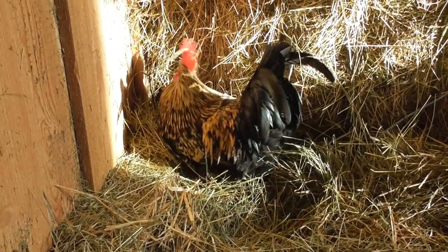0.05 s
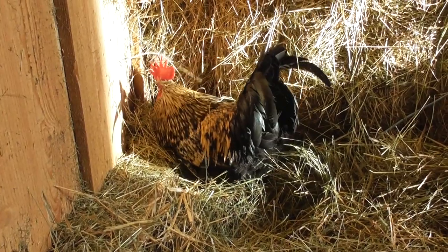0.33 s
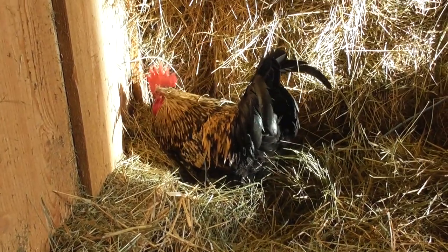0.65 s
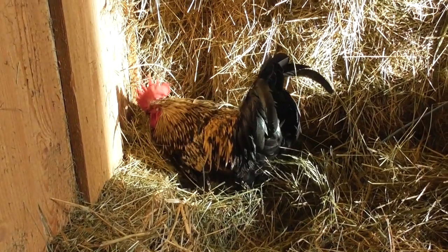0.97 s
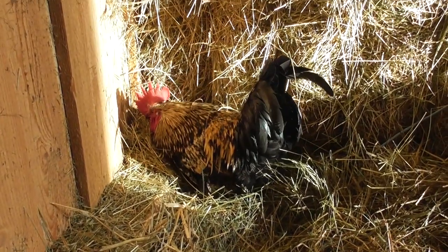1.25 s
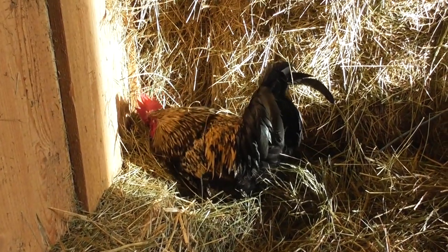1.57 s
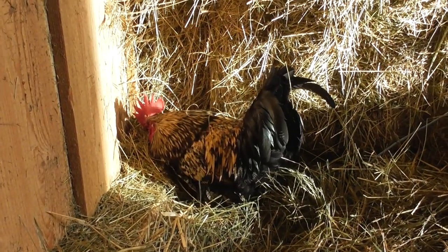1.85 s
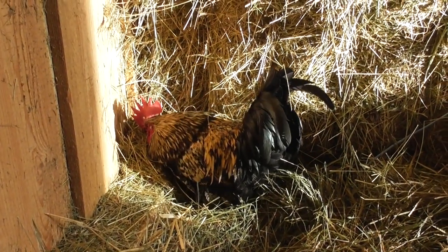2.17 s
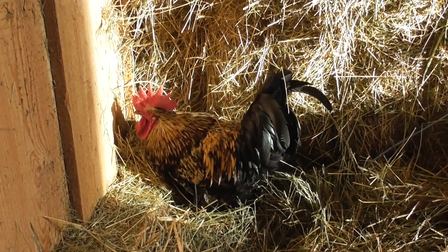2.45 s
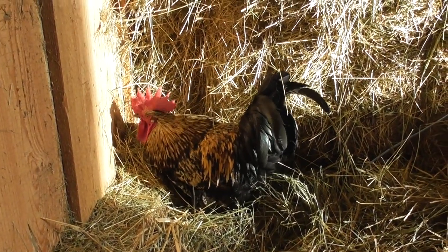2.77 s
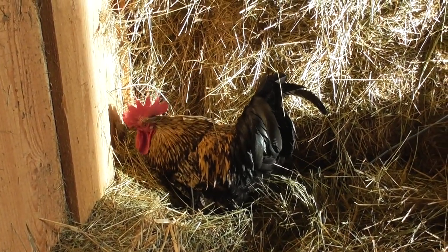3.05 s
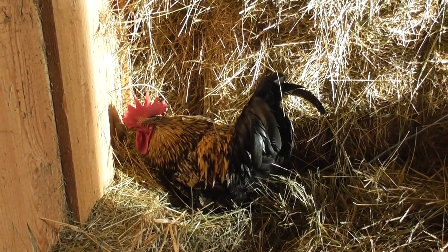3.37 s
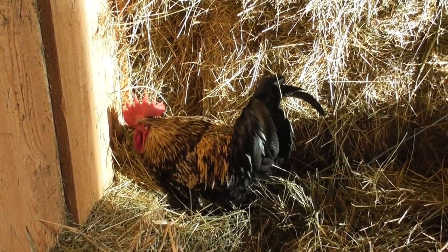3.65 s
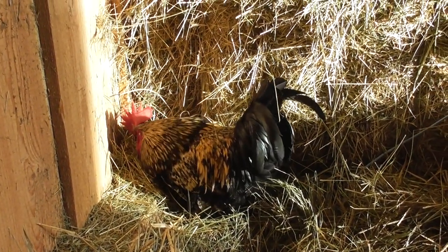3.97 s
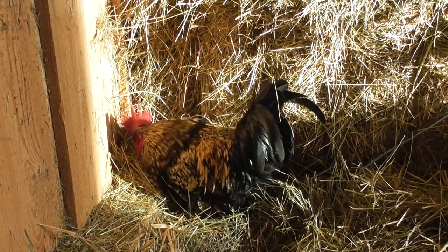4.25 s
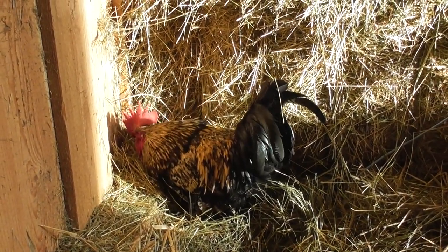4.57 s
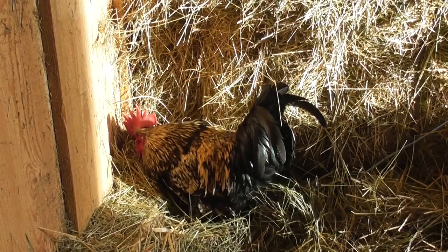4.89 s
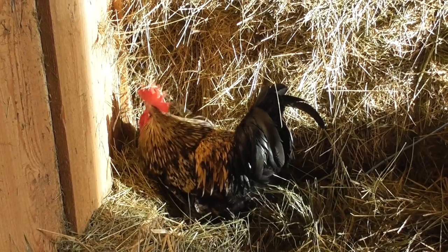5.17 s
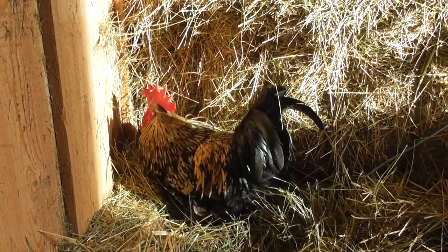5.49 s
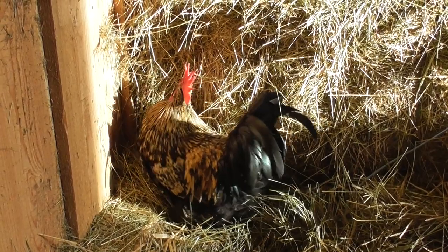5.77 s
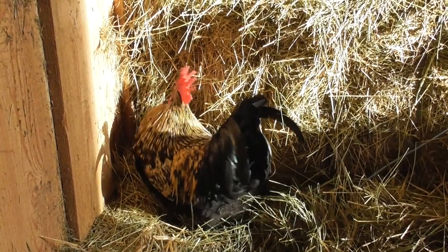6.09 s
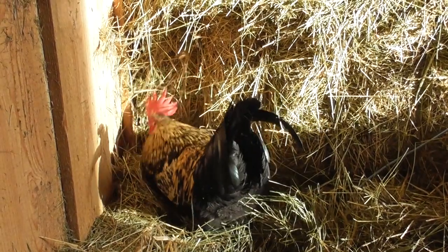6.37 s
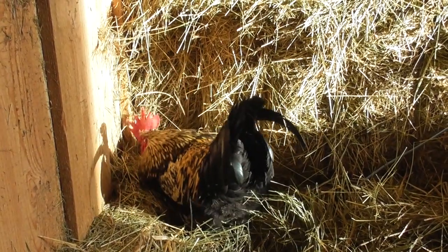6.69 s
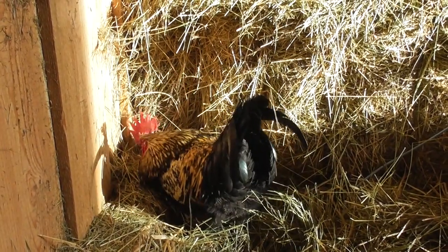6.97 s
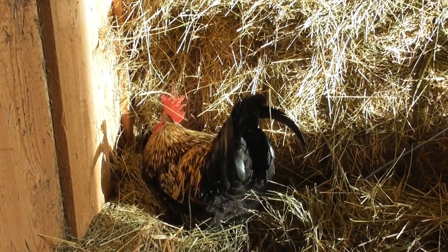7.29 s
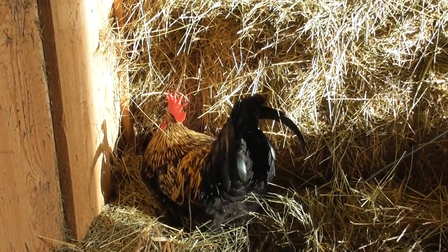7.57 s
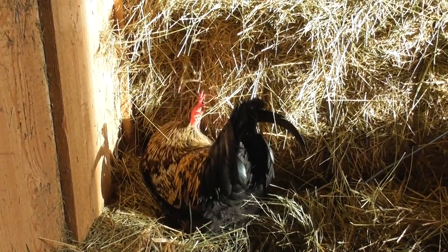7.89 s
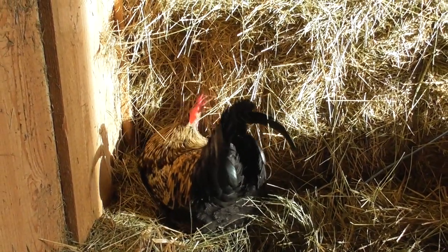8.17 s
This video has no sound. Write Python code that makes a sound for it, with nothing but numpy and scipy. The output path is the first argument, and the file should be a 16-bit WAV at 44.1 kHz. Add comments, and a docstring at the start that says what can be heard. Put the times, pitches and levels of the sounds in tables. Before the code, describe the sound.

A rooster clucks and coos softly up close while dry hay rustles and snaps under him in a quiet barn.

```python
"""A rooster clucks with his beak nearly shut as he settles into a nest of hay in a barn.
His syrinx is the source and his throat the filter: short pulse trains make runs of low knocks,
and sustained oscillation draws them out into cooing, rasping notes. Further off are short, low hen
notes and the faint, thin crows of a distant rooster. Hay rustles by friction and snaps by fracture
as he shuffles. The planks reflect the calls, over a low murmur of air and a faint hiss."""
import sys
import numpy as np
from scipy import signal
from scipy.fft import rfft, irfft
from scipy.io import wavfile

SR = 44100
rng = np.random.default_rng(int(sys.argv[2]) if len(sys.argv) > 2 else 0)


def int16_out(signal):
    """Quantize to a 16-bit WAV file."""
    q = np.round(np.clip(np.atleast_2d(signal).T, -1, 1) * 32767)
    wavfile.write(sys.argv[1], SR, q.astype(np.int16))


N = 367794

# spectrum of dry hay: f/Hz, relative spectral level/dB
HAY_SPECTRUM = [(500, -19.5), (1500, -10), (2400, -17), (2900, -15.5), (3900, -12.5), (5100, -22),
                (6100, -10.5), (7600, -3.5), (12000, -9.5), (16000, -17)]


def slapping(start, length, db, first_hz, last_hz, throat_hz, swell_db, limp=0, size=4096):
    """Source and filter: a gliding train of uneven slaps of the syrinx rings the throat."""
    t = np.arange(0, length, 1 / SR)
    uneven = 1 + .09 * wander(size, 400)[:len(t)]
    cycle = np.floor(np.cumsum(uneven * (first_hz + (last_hz - first_hz) * t / length)) / SR)
    slaps = np.diff(cycle, prepend=-1) * (1 - limp * (cycle % 2))
    pressure = gain_of(swell_db * t / length) * np.minimum((1 - t / length) / 0.21, 1)
    f = np.fft.rfftfreq(size, 1 / SR)
    voice = irfft(rfft(slaps * pressure, size) * throat(f, start, throat_hz))
    voice *= np.sqrt(len(t) / np.sum(voice ** 2))
    return gain_of(db) * buzzing(voice)


def clucks(climb_per_s=5):
    """Period doubling: as pressure builds, a slack syrinx weakens alternate slaps, an octave down."""
    # t/s, duration/s, relative level/dB, starting f/Hz, weakening of alternate slaps (0-1)
    calls = [(0.0045, 0.035, -24, 306.4, 0.21), (0.14, 0.028, -25, 299, 0.13),
             (1.517, 0.015, -28, 395.7, 0.9), (3.502, 0.019, -29, 331, 0.85),
             (3.629, 0.022, -27, 304.4, 0.6), (3.78, 0.02, -25.5, 295, 0.85),
             (3.944, 0.022, -26.5, 294, 0.8), (4.137, 0.02, -25, 307.5, 0.52),
             (4.3145, 0.011, -26.5, 413, 1), (5.308, 0.026, -21.5, 403.6, 0.46),
             (5.401, 0.0267, -22.5, 324.6, 0.0), (5.539, 0.026, -24, 322.7, 0.55),
             (5.663, 0.028, -23.5, 311, 0.21), (5.783, 0.026, -25, 305.6, 0.13),
             (5.901, 0.032, -28, 298.3, 0.5), (6.005, 0.036, -28.5, 294.2, 0.58),
             (6.128, 0.031, -29, 293.2, 0.4), (6.266, 0.041, -23.5, 330, 0.19)]
    out = np.zeros(N)
    for start, length, db, hz, limp in calls:
        last_hz = hz * (1 + climb_per_s * length)
        add(out, start, slapping(start, length, db, hz, last_hz, 430.2, swell_db=8.5, limp=limp))
    return out


def knocks():
    """Impulse response: one slap rings the throat as the syrinx opens ahead of a call."""
    # lone slaps: t/s, relative level/dB
    slaps = [(0.6331, -34.5), (1.684, -45), (5.2976, -25.5), (7.2033, -31.5), (7.7227, -36.5),
             (8.2571, -40.5)]
    out = np.zeros(N)
    for start, db in slaps:
        add(out, start, slapping(start, .0045, db, 200, 200, throat_hz=426, swell_db=0))
    return out


def puks(length_s=0.011, pitch_ratio=0.607):
    """Tension sets pitch: a tight syrinx lets go, and the pitch drops as the level leaps."""
    # sharp "puk" calls: t/s, relative level/dB, starting f/Hz
    calls = [(0.6651, -29, 557), (1.714, -23, 512), (6.5346, -25.5, 530), (6.7154, -29, 635),
             (7.2296, -24.1, 702), (7.7462, -23.5, 877), (8.2868, -27, 850)]
    out = np.zeros(N)
    for start, db, hz in calls:
        throat_hz = 421 * (hz / 553) ** 0.37  # a higher puk comes from a tighter throat
        add(out, start, slapping(start, length_s, db, hz, hz * pitch_ratio, throat_hz, swell_db=7))
    return out


def held_note(start, hz, rough, octave_db, nasal_db, throat_hz=450, jitter=0.08, undertone_db=-8):
    """Nonlinear oscillation: with roughness, alternating cycles give subharmonics, then chaos."""
    turns = np.cumsum(hz * (1 + jitter * rough * wander(len(hz), 160))) / SR
    order = np.arange(1, 17)[:, None] / 2  # harmonics and the half orders between them
    lines = throat(order * hz, start, throat_hz, width_hz=190, leak_db=-44.5)
    lines *= np.where(order % 1, 0.83 * rough, 1)
    lines *= gain_of(octave_db * np.log2(np.clip(order, 1, 2)) + undertone_db * (order < 1))
    voice = (lines * np.exp(2j * np.pi * order * turns)).real.sum(0)
    voice /= np.sqrt(np.sum(abs(lines) ** 2, 0) / 2)
    nasal = sum(gain_of(nasal_db - 3 * np.log2(k / np.pi)) * np.cos(2 * np.pi * k * turns)
                for k in range(3, 9))
    chaos = 1.88 * rough ** 2  # takes over only in the roughest stretches
    voice = (voice + chaos * rasp(len(hz), start, throat_hz)) / np.sqrt(1 + chaos ** 2)
    return buzzing(voice, buzz_db=-57, buzz_hz=3300, width_hz=1200) + nasal


def coos(clear=0.066, flutter_db=1.5, flutter_hz=70):
    """Onset of instability: a drawn-out note starts clear, roughens midway and clears again."""
    # one contour a note: t/s, relative level/dB, f/Hz
    contours = [
        [(0.223, -15, 422), (0.231, -17, 448.5), (0.303, -20, 447), (0.327, -24, 452), (0.353, -26.5, 379.4),
         (0.372, -23.5, 385)],
        [(6.29, -19, 380), (6.298, -29, 378), (6.314, -32, 474), (6.338, -23, 467), (6.368, -24.5, 445),
         (6.41, -19, 448), (6.496, -29, 451.5), (6.522, -29.5, 446)],
        [(7.858, -15, 510), (7.87, -30.5, 516.4), (7.944, -26, 498.7), (7.994, -29, 510.7), (8.022, -22, 488),
         (8.042, -27, 482)],
    ]
    # one timbre a note: midway roughness (0-1), gain from the octave up/dB, nasal overtone level/dB
    timbres = [(.3, -13.5, -57), (.52, -12.5, -49), (.88, -2, -55.5)]
    out = np.zeros(N)
    for contour, (roughness, octave_db, nasal_db) in zip(contours, timbres):
        start, db, hz = curves(contour)
        middle = abs(np.sin(np.linspace(0, np.pi, len(hz)))) ** 1.3
        rough = clear + (roughness - clear) * middle
        db = db + flutter_db * middle * wander(len(hz), flutter_hz)  # unsteady pressure
        note = held_note(start, hz, rough, octave_db, nasal_db)
        add(out, start, gain_of(db) * note * signal.windows.tukey(len(hz), .08))
    return out


def whines():
    """Sustained oscillation: short, high notes swell and fade, each about one pitch."""
    # t/s, duration/s, relative level/dB, f/Hz
    calls = [(0.64, 0.02, -42, 607), (1.69, 0.03, -38.5, 631.5), (6.567, 0.052, -34, 454.5),
             (6.641, 0.065, -39, 641.6), (6.728, 0.029, -39.5, 663), (7.795, 0.049, -41.5, 557),
             (7.832, 0.031, -28.5, 689), (8.037, 0.03, -33, 684)]
    out = np.zeros(N)
    for start, length, db, hz in calls:
        envelope = signal.windows.tukey(round(length * SR), 0.55)
        pitch = np.full(len(envelope), float(hz))
        note = held_note(start, pitch, rough=0.4, octave_db=-7.5, nasal_db=-49)
        add(out, start, gain_of(db) * envelope * note)
    return out


def rasp(size, start, throat_hz, lowest_hz=260):
    """Chaotic flapping of the syrinx has a continuous spectrum, which the throat filters."""
    f = np.fft.rfftfreq(size, 1 / SR)
    flaps = np.exp(2j * np.pi * rng.random(len(f))) * f ** 4 / (f ** 4 + lowest_hz ** 4)
    return unit_rms(irfft(flaps * throat(f, start, throat_hz, width_hz=160), size))


def throat(f, start, main_hz, width_hz=85, leak_db=-52):
    """Formants in cascade: the shut beak passes little above 1.1 kHz but a nasal ring and some buzz."""
    # the neck stretches as the clucking grows keener:
    # t/s, upper formant f/Hz, nasal ring f/Hz, nasal ring level/dB
    neck = [(.2, 940, 2396, -40), (4.3, 902, 2218, -48), (5.35, 1055, 2090, -43), (5.7, 1040, 2100, -29),
            (5.91, 980, 2410, -27.5), (6.5, 1135, 2670, -43)]
    times, *columns = np.transpose(neck)
    upper_hz, nasal_hz, nasal_db = [np.interp(start, times, column) for column in columns]
    body = formant(f, main_hz, width_hz) * formant(f, 709, 410) * formant(f, upper_hz, 300)
    body /= 1 + 1j * f / 300
    leak = gain_of(nasal_db) * ring(f, nasal_hz, 90) + gain_of(leak_db) * ring(f, 3550, 400)
    chest_hz = 157 * (main_hz / 410) ** 3.9  # a tighter throat also thins the bass
    high_pass = formant(f, chest_hz, 160) * (f / chest_hz) ** 2
    return (body + leak) * high_pass ** 2


def buzzing(voice, buzz_db=-48, buzz_hz=2300, width_hz=1500):
    """Modulated turbulence: air squeezed through the nostrils adds a faint fizz to each cycle."""
    f = np.fft.rfftfreq(len(voice), 1 / SR)
    spectrum = rfft(rng.standard_normal(len(voice))) * ring(f, buzz_hz, width_hz) ** 2
    fizz = unit_rms(irfft(spectrum, len(voice)))
    return voice + gain_of(buzz_db) * fizz * np.maximum(voice, 0)


def other_birds(jitter=0.044, arch=0.017, fade_db=-5):
    """Harmonic series: open-beaked notes, shaped by the throat, arch slightly in pitch."""
    # short, low hen notes and faint, thin crows of a distant rooster:
    # t/s, duration/s, relative level/dB, f/Hz
    calls = [(1.843, 0.38, -71, 1105), (2.27, 0.05, -53.5, 249), (2.315, 0.045, -46, 263.2),
             (2.416, 0.031, -46.5, 287), (2.574, 0.043, -36.5, 345.2), (4.3, 0.49, -70, 1064),
             (6.057, .05, -42.5, 287.8), (6.174, 0.035, -43, 282.5), (6.898, 0.26, -70, 1080)]
    # throat response: f/Hz, relative level/dB
    response = [(250, 7.5), (350, -3), (700, 2), (1050, -2.5), (1400, -12.5), (1750, -28.5), (2100, -29.5),
                (3000, -42)]
    out = np.zeros(N)
    for start, length, db, hz in calls:
        progress = np.linspace(0, 1, round(length * SR))
        pitch = hz * (1 - arch * (2 * progress - 1) ** 2 + jitter * wander(len(progress), 140))
        turns = np.cumsum(pitch) / SR
        voice = sum(gain_of(value_at(response, k * hz)) * np.cos(2 * np.pi * k * turns)
                    for k in range(1, 9))
        envelope = gain_of(db + fade_db * progress) * signal.windows.tukey(len(progress), .2)
        add(out, start, envelope * unit_rms(voice))
    return out


def rustle(cracks_per_s=1600, spread_db=5.0, rest_db=-79):
    """Friction: feathers rub on dry stalks in swells of soft hiss full of tiny cracks."""
    # movements in the hay: centre t/s, half duration/s, relative level/dB
    shuffles = [(0.164, 0.39, -65), (0.801, 0.24, -71.5), (1.56, 0.066, -67), (2.39, 0.096, -67.5),
                (3.952, 0.11, -67.5), (4.28, 0.079, -63.5), (5.216, .04, -65), (5.789, 0.3, -66),
                (6.268, 0.074, -51), (6.414, 0.24, -59), (6.833, 0.051, -59.5), (7.239, 0.066, -58),
                (7.354, 0.08, -62), (7.844, 0.066, -58), (8.3, 0.12, -59.5)]
    cracks = rng.standard_normal((2, N)) * (rng.random(N) < cracks_per_s / SR)
    cracks *= gain_of(spread_db * np.minimum(rng.exponential(1, N), 2 * np.e - 1))
    rubbing = rng.standard_normal((2, N))
    t = np.arange(N) / SR
    power = gain_of(rest_db) ** 2 + sum(gain_of(db) ** 2 / (1 + ((t - centre) / width) ** 2) ** 2
                                        for centre, width, db in shuffles)
    return coloured(unit_rms(cracks) + rubbing, HAY_SPECTRUM) * np.sqrt(power)


def snaps(t60=0.04, rise_s=0.0078, relative_width=0.6, size=2048):
    """Damped resonance: each breaking or pecked stalk splinters in a burst around its own pitch."""
    # stalks that snap: t/s, relative peak level/dB, f/Hz
    fractures = [(0.393, -50.5, 8000), (0.8772, -47.5, 8610), (1.884, -45, 9470), (5.3438, -39.5, 8670),
                 (5.5759, -44, 7900), (5.8856, -42, 9980), (6.0237, -44, 7420), (6.4283, -38.5, 8810),
                 (6.537, -37.5, 9910), (7.236, -39, 9030), (7.3834, -45.5, 7380), (8.2172, -35.5, 13100)]
    # duller taps of the beak: t/s, relative peak level/dB, f/Hz
    pecks = [(0.09, -54, 3180), (1.749, -56.5, 3520), (1.812, -55, 3350), (5.444, -56.5, 3600)]
    out = np.zeros((2, N))
    t, f = np.arange(size) / SR, np.fft.rfftfreq(size, 1 / SR)
    for start, db, hz in fractures + pecks:
        age = t * max(hz / 8440, 1) ** 3.7  # thinner stalks snap higher and shorter
        noise = rng.standard_normal(size) + 0.18 * rng.standard_normal((2, size))
        envelope = gain_of(-60 * age / t60) * (1 - np.exp(-age / rise_s))
        stalk = gain_of(.5 * value_at(HAY_SPECTRUM, f)) * formant(f, hz, hz * relative_width) * f
        burst = irfft(rfft(noise * envelope) * stalk)
        add(out, start, gain_of(db - 3) * burst / abs(burst).max() * (1 - t / t[-1]))
    return out


def nook(x, mode_hz=450, width_hz=9, mode_db=-13):
    """Early reflections and one standing wave that hums on in the corner by the nest."""
    # echoes off the planks: delay t/s, left level/dB, right level/dB
    planks = [(.007, -15.5, -16), (0.0198, -22, -15), (0.044, -20, -15), (0.055, -28.5, -19.5)]
    f = np.fft.rfftfreq(N + SR, 1 / SR)
    hum = irfft(rfft(x, N + SR) * ring(f, mode_hz, width_hz), N + SR)[:N]
    out = gain_of(mode_db) * np.array([hum, hum])
    for delay, left_db, right_db in planks:
        add(out, delay, gain_of([[left_db], [right_db]]) * x)
    return out


def barn(x, echoes_per_s=3000):
    """Diffuse reverberation: echoes of random sign decay exponentially, each band at its own rate."""
    # reverberation time: f/Hz, t60/s
    decay_times = [(150, 0.41), (450, 0.43), (1000, 0.47), (3000, 0.3), (10000, 0.092)]
    echoes = rng.choice([-1., 1.], (2, SR)) * (rng.random((2, SR)) < echoes_per_s / SR)
    echoes[1] = 0.56 * echoes[0] + 0.77 * echoes[1]  # left and right are partly coherent
    hz, t, bands = signal.stft(echoes, SR, nperseg=256)
    decay = gain_of(-60 * t / value_at(decay_times, hz)[:, None])
    tail = signal.istft(bands * decay, SR, nperseg=256)[1]
    tail *= np.clip(np.arange(tail.shape[1]) / SR / 0.0064 - 1, 0, 1)  # a short gap, then a fade-in
    return signal.fftconvolve(x[None], tail / np.linalg.norm(tail[0]), axes=1)[:, :N]


def still_air(murmur_db=-61.5, hiss_db=-68.5):
    """Stationary noise: a low murmur of air and a faint hiss."""
    # both spectra: f/Hz, relative spectral level/dB
    murmur_spectrum = [(15, -38.5), (25, -16), (55, -2), (87, -10), (200, -14), (311, -15.5), (439, -17.5),
                       (778, -20.5), (1040, -23), (1520, -32.5), (1950, -28.5), (2400, -37), (3120, -61.5),
                       (5280, -120)]
    hiss_spectrum = [(1500, -37), (2400, -6.5), (3000, -4.5), (3800, -1), (5100, -10.5), (6200, -5.5),
                     (7600, 0.5), (10000, 1), (16000, 3.5)]
    murmur = gain_of(murmur_db) * coloured(rng.standard_normal((2, N)), murmur_spectrum)
    hiss = gain_of(hiss_db) * coloured(rng.standard_normal((2, N)), hiss_spectrum)
    return murmur + hiss


def coloured(pair, spectrum):
    """Partial coherence: two independent noises are blended into left and right of one spectrum."""
    # f/Hz, left-right correlation (0-1)
    correlation = [(30, .75), (70, 0.19), (300, 0.25), (1000, 0.27), (2000, .9), (4000, 1), (8000, 0.98),
                   (13000, 0.23)]
    hz = np.fft.rfftfreq(N, 1 / SR)
    left, independent = rfft(pair)
    shared = np.clip(value_at(correlation, hz), -1, 1)
    right = shared * left + np.sqrt(1 - shared ** 2) * independent
    return unit_rms(irfft(np.array([left, right]) * gain_of(value_at(spectrum, hz)), N))


def formant(f, hz, width):
    """Second-order resonance: flat below its frequency, falling above it."""
    return 1 / (1 - (f / hz) ** 2 + 1j * f * width / hz ** 2)


def ring(f, hz, width):
    """Band-pass resonance: gain one at the peak, falling on both sides."""
    return formant(f, hz, width) * 1j * f * width / hz ** 2


def wander(size, hz):
    """Low-pass noise: a smooth fluctuation with its cutoff at hz."""
    f = np.fft.rfftfreq(size, 1 / SR)
    return unit_rms(irfft(rfft(rng.standard_normal(size)) / (1 + (f / hz) ** 4), size))


def gain_of(db):
    """Amplitude ratio of a level in decibels."""
    return 10 ** (np.asarray(db) / 20)


def unit_rms(x):
    """Normalisation to an rms of one."""
    return x / np.sqrt(np.mean(x ** 2) + 1e-20)


def value_at(points, hz):
    """Interpolation on a logarithmic frequency axis."""
    f, value = np.transpose(points)
    return np.interp(np.log(hz + 1), np.log(f + 1), value)


def curves(rows):
    """Linear interpolation in time: the start, then each column sample by sample."""
    times, *columns = np.transpose(rows)
    t = np.arange(times[0], times[-1], 1 / SR)
    return [times[0]] + [np.interp(t, times, column) for column in columns]


def add(mix, start, sound):
    """Superposition: a sound joins the mix at its start time in seconds."""
    part = mix[..., max(round(start * SR), 0):][..., :sound.shape[-1]]
    part += sound[..., :part.shape[-1]]


def scene():
    """Direct-to-reverberant ratio sets distance: the rooster close by, other birds further off."""
    rooster = gain_of(1.15) * (clucks() + knocks() + puks() + whines()) + gain_of(-0.65) * coos()
    birds = other_birds()
    near = rooster * gain_of([[-2.4], [1.6]]) + nook(rooster) + gain_of(-16.5) * barn(rooster)
    far = birds * gain_of([[-7], [0]]) + gain_of(-9) * barn(birds)
    air = still_air()
    hay = (rustle() + snaps()) * gain_of([[.7], [-.7]])
    return near + far + hay + air


def record(dry):
    """Band limiting: a linear-phase low-pass removes the treble above 15.9 kHz."""
    low_pass = signal.firwin(511, 15900, window=("kaiser", 9), fs=SR)
    return signal.oaconvolve(dry, low_pass[None], "same", axes=1)


dry = scene()
out = record(dry)
int16_out(out)
```